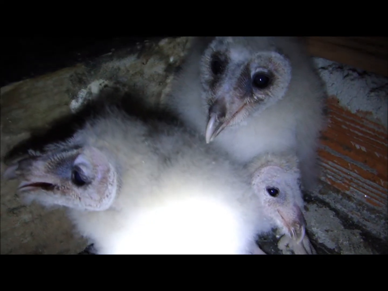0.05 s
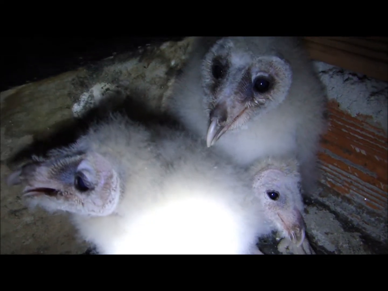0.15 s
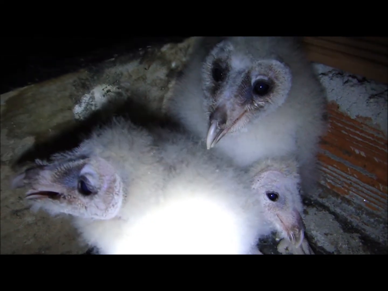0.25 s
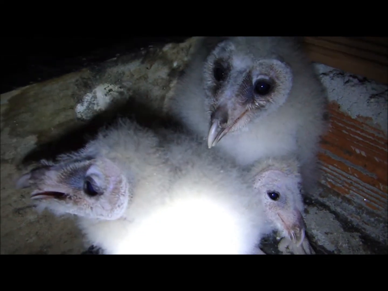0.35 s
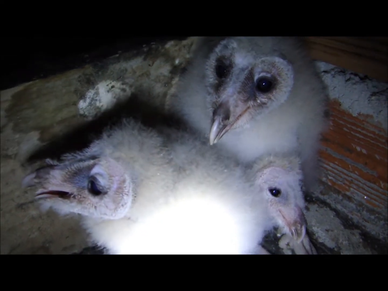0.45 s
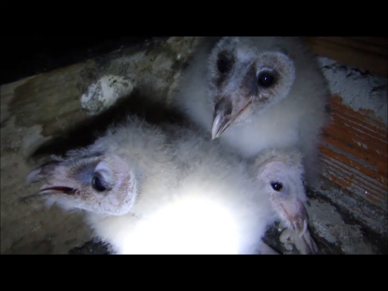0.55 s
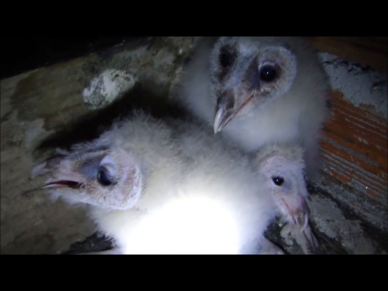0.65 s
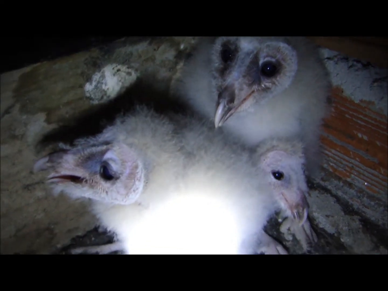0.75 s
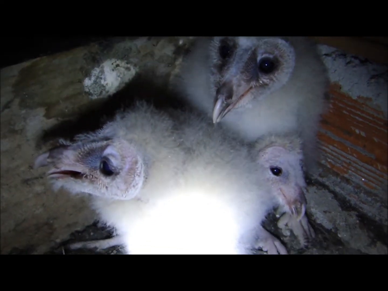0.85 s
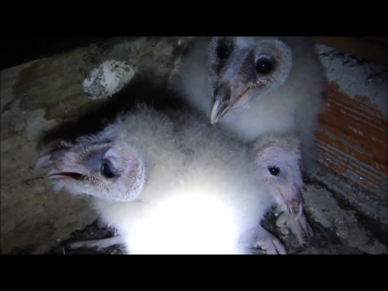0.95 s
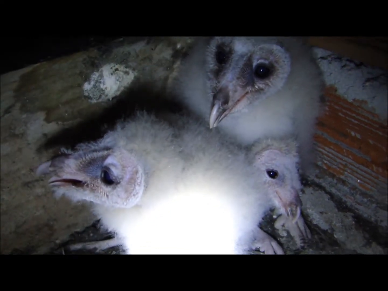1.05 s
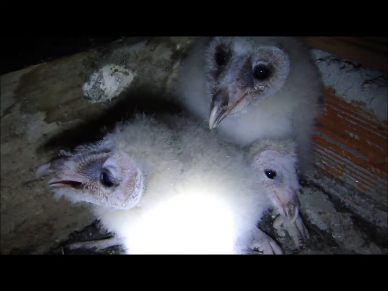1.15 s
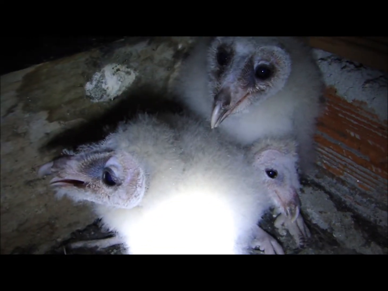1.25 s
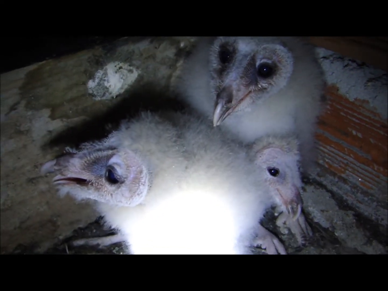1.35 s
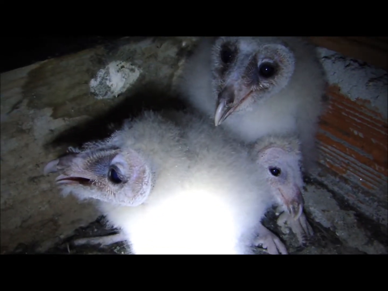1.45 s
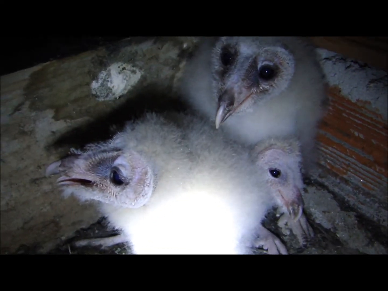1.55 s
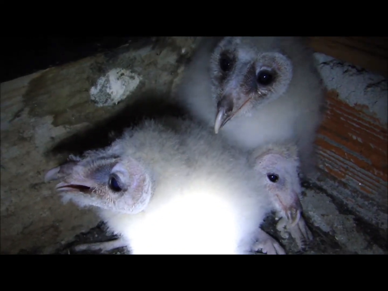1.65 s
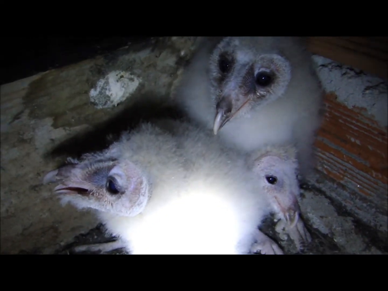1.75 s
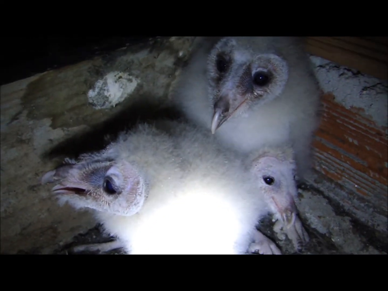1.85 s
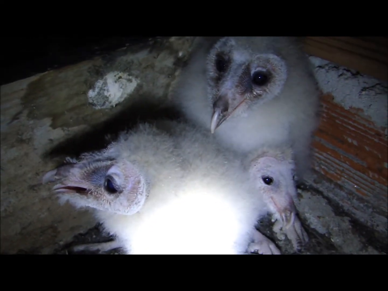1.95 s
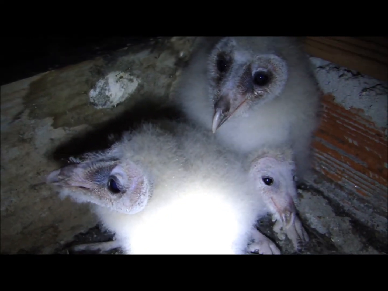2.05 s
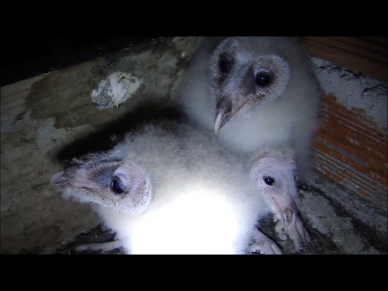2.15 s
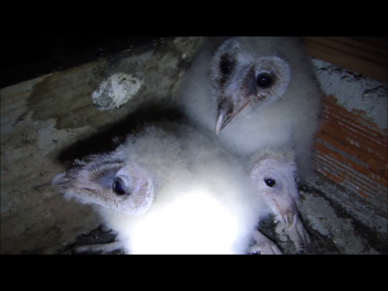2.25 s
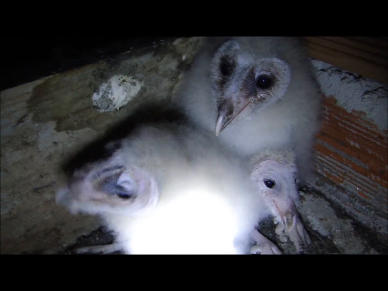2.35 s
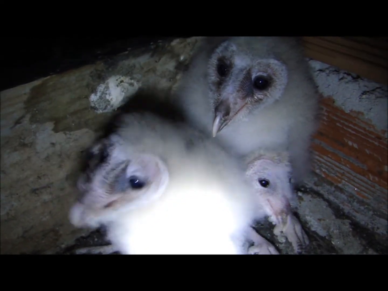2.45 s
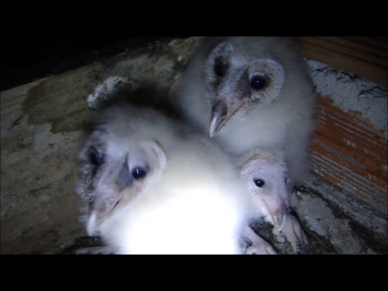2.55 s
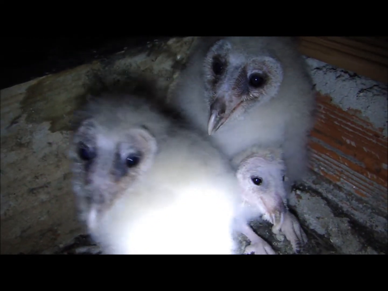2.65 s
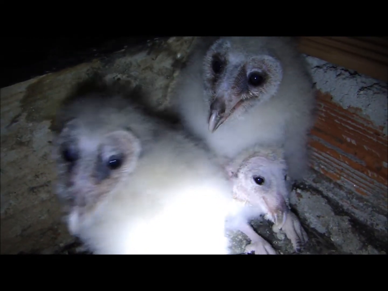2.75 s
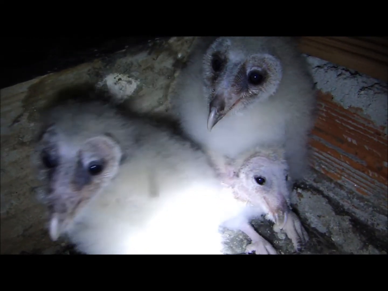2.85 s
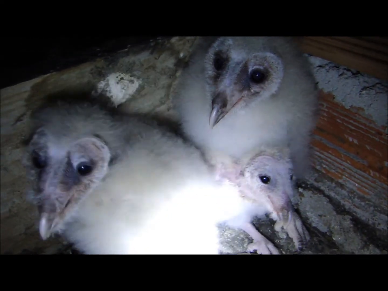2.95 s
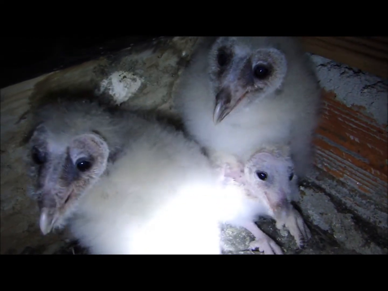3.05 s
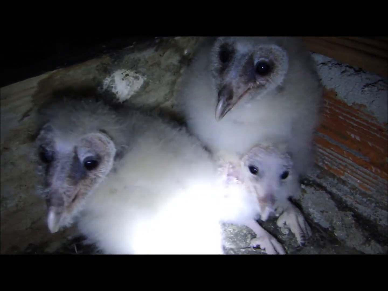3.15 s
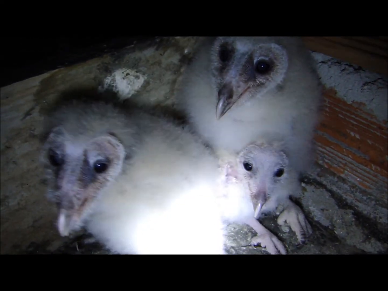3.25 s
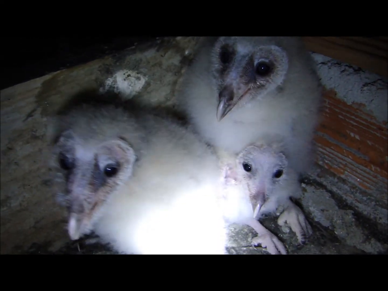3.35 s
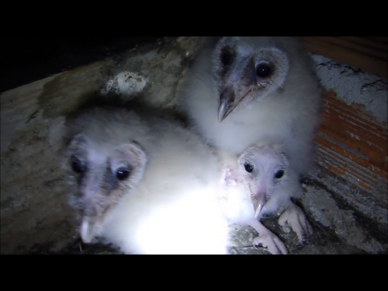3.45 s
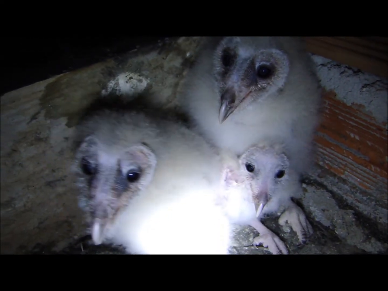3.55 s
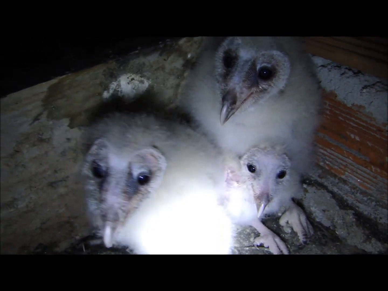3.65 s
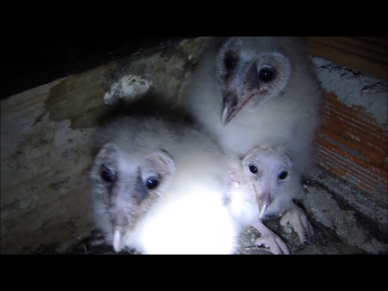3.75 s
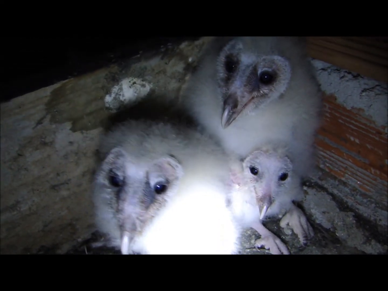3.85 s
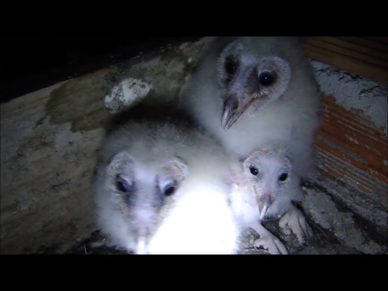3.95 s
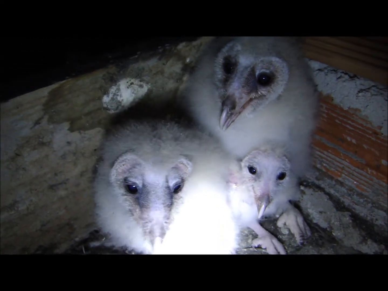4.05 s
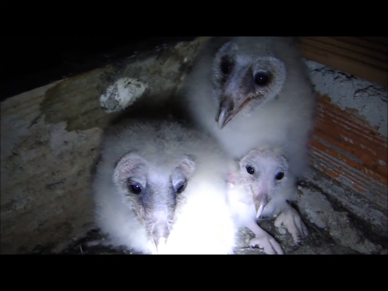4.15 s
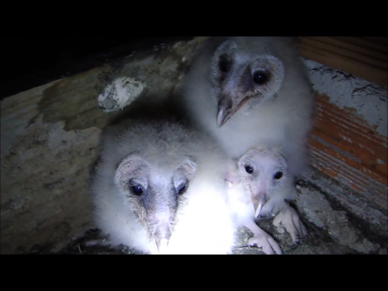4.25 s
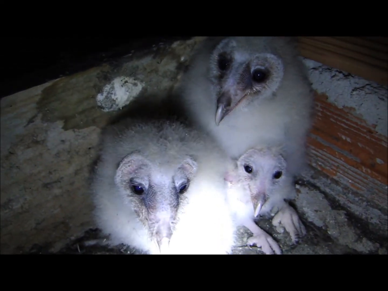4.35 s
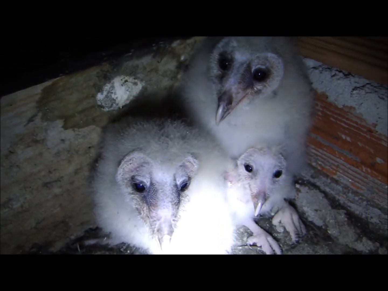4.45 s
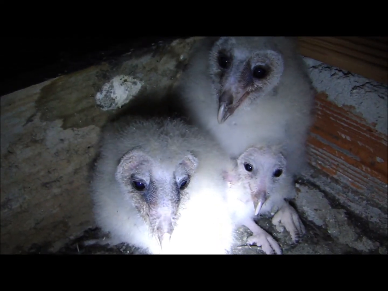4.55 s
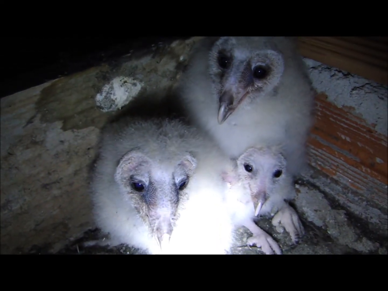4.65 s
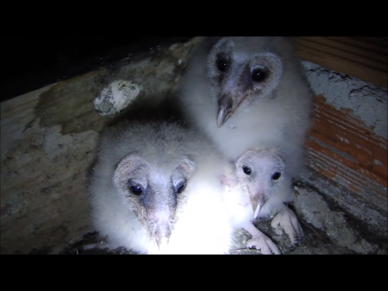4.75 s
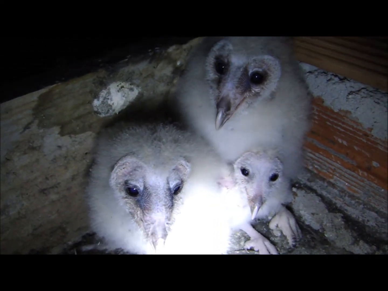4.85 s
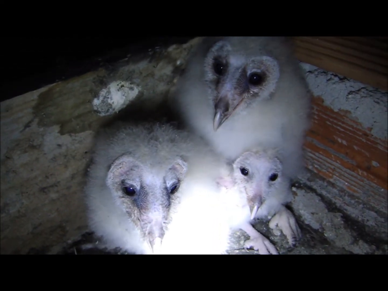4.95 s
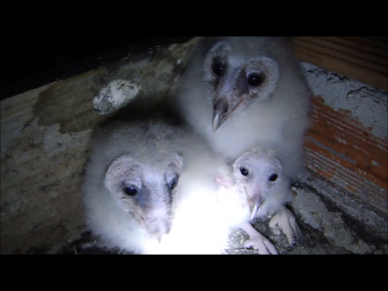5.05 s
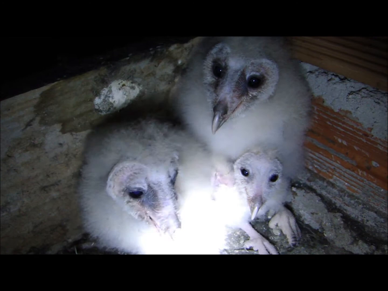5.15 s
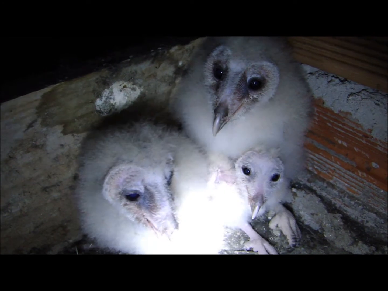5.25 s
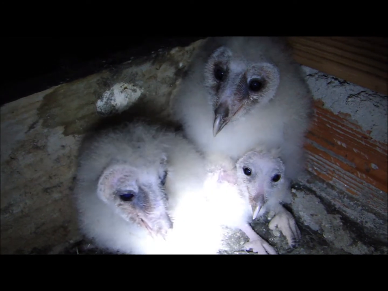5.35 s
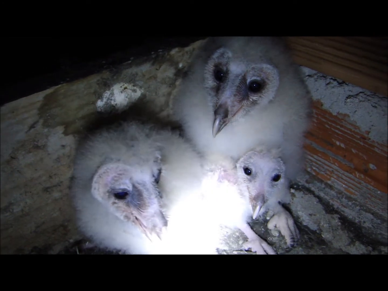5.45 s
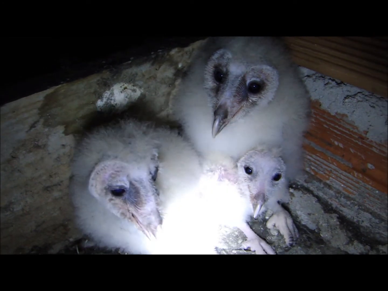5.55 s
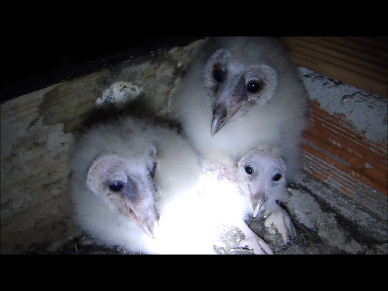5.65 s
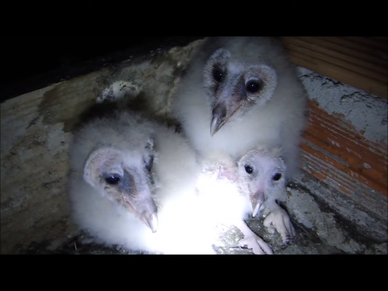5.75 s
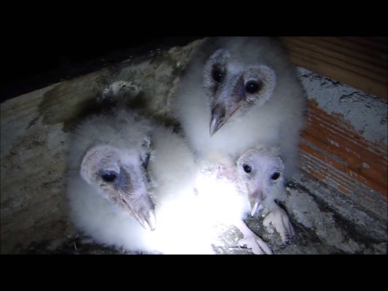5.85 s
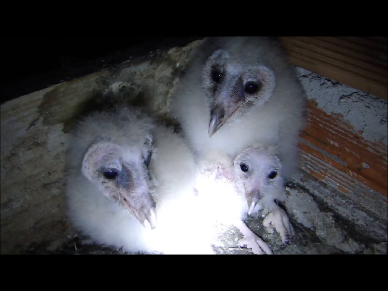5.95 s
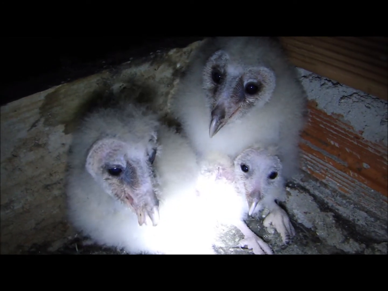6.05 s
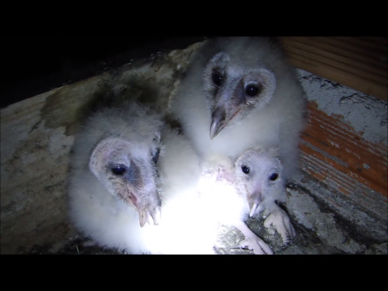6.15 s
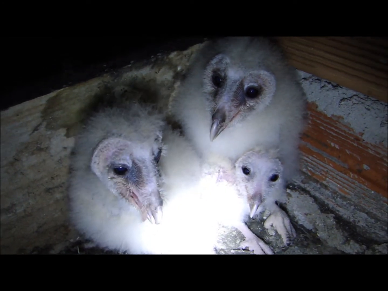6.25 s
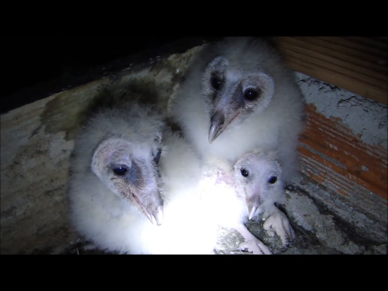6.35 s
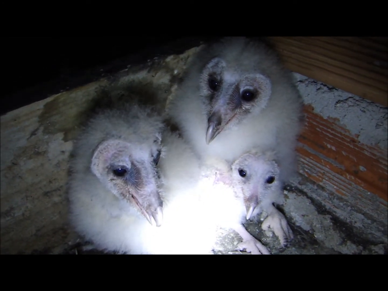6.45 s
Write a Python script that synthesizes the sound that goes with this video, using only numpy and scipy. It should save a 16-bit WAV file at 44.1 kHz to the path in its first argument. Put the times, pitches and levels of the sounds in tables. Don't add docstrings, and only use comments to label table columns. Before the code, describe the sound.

Owl chicks hiss close to a small camera in a cramped wooden nest. Two rough, airy hisses overlap from the start; the nearer stops first and the softer one stumbles out. Faint litter rustle and a hollow bill snap fill the pause, then a third hiss bursts in with a throaty pop and continues, with another snap beneath it, until an abrupt cut.

```python
import sys
import numpy as np
from scipy import signal
from scipy.io import wavfile
from scipy.ndimage import uniform_filter1d, minimum_filter1d

SR = 44100
rng = np.random.default_rng(int(sys.argv[2]) if len(sys.argv) > 2 else 0)


def ratio(d):
    e = np.asarray(d, float) / 20
    return 10 ** e


def transcribe(u):
    v = np.clip(np.atleast_2d(u).T, -1, 1)
    q = np.round(v * 32767).astype(np.int16)
    wavfile.write(sys.argv[1], SR, q)


N = 287091


def evened(x):
    return x / np.sqrt(np.mean(x ** 2) + 1e-20)


def read(points, hz, axis=1):
    columns = np.transpose(points)
    return np.interp(np.log(hz + 1), np.log(columns[0] + 1), columns[axis])


def ring(hz, db, t60):
    t = np.arange(8000) / SR
    return ratio(db - 60 * t / t60) * np.sin(2 * np.pi * hz * t)


def pressure(t, breath, lungs, falters):
    start, end, effort_db, swell_db, flutter_db = breath
    build_db, build_s, fade_db, fade_s, _ = lungs
    catch_s, slack_flutter = .035, .11
    age, left = np.maximum(t - start, 0), np.maximum(end - t, 0)
    lost_db = build_db * np.exp(-age / build_s) + fade_db * np.exp(-left / fade_s)
    for s, depth_db, sag_s in falters:
        lost_db = lost_db + depth_db * np.exp(-((t - s) / np.where(t < s, sag_s, catch_s)) ** 2)
    return effort_db + swell_db * age - lost_db, flutter_db + slack_flutter * lost_db


def opening(t, start, first, drift, turn_s, length_s, share):
    turn = share * (1 + np.tanh((t - turn_s) / length_s)) / 2
    return np.clip(first + drift * (t - start) + turn, 0, 1)


def throat_power(throat, hz, pose):
    power = 0
    for hz0, hz1, width, db0, db1, pan_db in throat:
        center = hz0 + (hz1 - hz0) * pose
        shape = (1 + (2 * (hz - center) / (1.443 * width)) ** 2) ** -2
        ports = ratio([pan_db, -pan_db])[:, None, None]
        power = power + ratio(2 * (db0 + (db1 - db0) * pose)) * shape * ports
    return power


def pocket_dip(pockets, hz, pose):
    dip_db = 0
    for hz0, hz1, width, db0, db1 in pockets:
        center = hz0 + (hz1 - hz0) * pose
        depth_db = np.maximum(db0 + (db1 - db0) * pose, 0)
        dip_db = dip_db + depth_db * np.exp(-(2 * (hz - center) / width) ** 2)
    return dip_db


def hiss(breath, lungs, falters, bill, throat, pockets, lag_s, patchy_db, end_s, pops=()):
    t = np.arange(N) / SR
    start, end = breath[:2]
    effort_db, flutter_db = pressure(t, breath, lungs, falters)
    flutter = evened(uniform_filter1d(uniform_filter1d(rng.standard_normal(N), 90), 60))
    jet = rng.standard_normal(N) * ratio(flutter_db * flutter)
    for at, db in pops:
        jet[round(at * SR)] = ratio(db)
    hz, frames, z = signal.stft(evened(jet), SR, nperseg=512, noverlap=384)
    hz = hz[:, None]
    pose = opening(frames, start, *bill)

    power = throat_power(throat, hz, pose) * ratio(-2 * pocket_dip(pockets, hz, pose))
    power = power / (1 + (300 / (hz + 1)) ** 6)
    patches = uniform_filter1d(rng.standard_normal(z.shape), size=6, axis=0)
    patches = evened(uniform_filter1d(patches, size=20, axis=1))
    gain = np.sqrt(power / power.mean((0, 1))) * ratio(patchy_db * patches)
    dull_s = .055
    dulling = np.exp(-np.maximum(end - frames, 0) / dull_s)
    gain = gain * ratio(-lungs[-1] * hz / 1000 * dulling)
    delay = np.array([np.exp(2j * np.pi * hz * lag_s), 1 + 0 * hz])
    pair = signal.istft(z * gain * delay, SR, nperseg=512, noverlap=384)[1][:, :N]
    gate = np.clip((t - start) / 0.00094 + 1, 0, 1) * np.clip((end - t) / end_s + .5, 0, 1)
    return pair * gate * ratio(effort_db)


# start in seconds, end in seconds, effort in dB, swell in dB per second,
# flutter in dB.
NEAR_BREATH = (0, 1.925, -17.5, -.2, .4)
# build in dB, build in seconds, fade in dB, fade in seconds,
# dulling in dB per kHz.
NEAR_LUNGS = (.3, .3, 5, .022, 1.3)
# deepest in seconds, depth in dB, sag in seconds.
NEAR_FALTERS = [
    (1.36, 1.5, .04),
]
# first pose from 0 to 1, drift per second, turn in seconds,
# turn length in seconds, turn size from 0 to 1.
NEAR_BILL = (.21, .06, 1.45, .07, .42)
# first Hz, last Hz, width in Hz, first level in dB, last level in dB,
# left-right in dB.
NEAR_THROAT = [(1316, 1690, 390, -6, -7.5, -2.5), (1874, 2040, 180, -2.5, -7.7, -11.5),
               (2340, 2200, 210, -7.5, -10.5, 9), (2900, 2770, 730, -9, -12.5, -8),
               (4200, 4550, 700, -7, -6, 0.2), (5650, 4500, 2500, -16, -22, -5),
               (7570, 7200, 1220, -12.5, -18.5, 0.5), (9360, 8600, 480, -13, -12.5, -1.5),
               (10500, 11300, 850, -2.5, -25, -3.7), (12350, 11140, 560, -9, -37, 8)]
# first Hz, last Hz, width in Hz, first depth in dB, last depth in dB.
NEAR_POCKETS = [(10100, 9500, 1100, 2, 22), (8900, 8300, 420, 7, 14)]


def near_chick():
    return hiss(NEAR_BREATH, NEAR_LUNGS, NEAR_FALTERS, NEAR_BILL, NEAR_THROAT, NEAR_POCKETS,
                lag_s=.00005, patchy_db=0.2, end_s=0.012)


# start in seconds, end in seconds, effort in dB, swell in dB per second,
# flutter in dB.
FAR_BREATH = (0, 2.955, -30.5, 1.3, .85)
# build in dB, build in seconds, fade in dB, fade in seconds, dulling in dB per kHz.
FAR_LUNGS = (.3, .3, 5.5, .08, .1)
# deepest in seconds, depth in dB, sag in seconds.
FAR_FALTERS = [
    (2.39, 3.5, .08),
    (2.57, 3.5, .06),
    (2.74, 5.5, .05),
    (2.9, 2.5, .03),
]
# first pose from 0 to 1, drift per second, turn in seconds,
# turn length in seconds, turn size from 0 to 1.
FAR_BILL = (.12, .03, 2.25, .22, .42)
# first Hz, last Hz, width in Hz, first level in dB, last level in dB,
# left-right in dB.
FAR_THROAT = [(628, 746, 312, -3.5, -0.7, -10), (1145, 1080, 190, 3.7, -2.3, -11.5),
              (1770, 1660, 250, -2, -6, -3), (2620, 2430, 740, -3.5, -1.5, -8.5),
              (4430, 4420, 700, -4, -11, -5), (6900, 5900, 1400, -25, -19, -5),
              (8080, 7500, 640, -20.5, -16.5, -14), (10200, 3400, 2000, -24, -27, -2.5),
              (12230, 11300, 1050, -2, -9, -2.5)]
# first Hz, last Hz, width in Hz, first depth in dB, last depth in dB.
FAR_POCKETS = [(6060, 5900, 420, 17, 9), (8900, 8750, 290, 11, 10), (9700, 9800, 600, 11, 2)]


def far_chick():
    return hiss(FAR_BREATH, FAR_LUNGS, FAR_FALTERS, FAR_BILL, FAR_THROAT, FAR_POCKETS,
                lag_s=-0.000038, patchy_db=0.33, end_s=0.011)


def scattered(x):
    z = signal.stft(x, nperseg=512, noverlap=384)[2]
    turn = np.exp(2j * np.pi * rng.random(z.shape[1:]))
    return 2 * signal.istft(z * turn, nperseg=512, noverlap=384)[1][:, :N] * (x != 0)


# pitch in Hz, time to fall 60 dB in seconds.
BOX = [(250, 0.05), (1000, 0.05), (4600, 0.038), (10000, 0.043)]
# pitch in Hz, level in dB, time to fall 60 dB in seconds.
LOFT = [(250, -30, .1), (600, -22, 0.4), (920, -11, 0.42), (1500, -13, 0.2), (2500, -23.5, .1),
        (5000, -23, 0.11)]


def box():
    taps = np.zeros((2, 13000))
    at = np.arange(80, 12960, 20) + rng.integers(0, 20, (2, 644))
    np.put_along_axis(taps, at, rng.choice([-1., 1.], at.shape), 1)
    hz, t, z = signal.stft(taps, SR, nperseg=128)
    hz = hz[:, None]
    box_decay = ratio(-60 * t / read(BOX, hz))
    loft_decay = ratio(read(LOFT, hz) - 60 * t / read(LOFT, hz, axis=2))
    tail = signal.istft(z * (box_decay + loft_decay), SR, nperseg=128)[1]
    return tail / np.linalg.norm(tail, axis=1, keepdims=True)


# pitch in Hz, width in Hz, depth in dB.
HOLLOWS = [(814, 36, 8), (1036, 75, 7.5), (1317, 39, 5), (1540, 30, 4.5), (2142, 37, 7), (3380, 200, 1.5),
           (7450, 70, 1.5)]


def hollowed(x):
    for hz, width, db in HOLLOWS:
        x = x - (1 - ratio(-db)) * signal.lfilter(*signal.iirpeak(hz, hz / width, SR), x)
    return signal.sosfilt(signal.butter(6, 290, "high", fs=SR, output="sos"), x)


# pitch in Hz, level in dB per Hz.
FLOOR = [(18, -50), (30, -22), (77, -12.5), (330, -8), (420, -4), (1100, -7), (7500, -23.5), (12900, -27)]
# pitch in Hz, likeness from -1 (opposed) to 1 (same).
FLOOR_SAME = [(30, .7), (100, -0.1), (300, -0.59), (2000, -.5), (5000, -0.25), (9000, -0.05), (13000, -0)]
# pitch in Hz, level in dB.
WHINE = [(7822, -92), (7854, -86), (7881, -67.5), (7913, -87)]


def floor():
    floor_db = -51
    frames, hz = N // 256 + 5, np.fft.rfftfreq(1024, 1 / SR)
    a, b, c, d, patches = rng.standard_normal((frames, 513, 5)).T
    patches = evened(uniform_filter1d(uniform_filter1d(patches, size=10, axis=0), size=12, axis=1))
    same = np.clip(read(FLOOR_SAME, hz), -1, 1)[:, None]
    left = a + 1j * b
    right = same * left + np.sqrt(1 - same ** 2) * (c + 1j * d)
    z = np.array([left, right]) * ratio(read(FLOOR, hz)[:, None] + 0.74 * patches)
    z = z / (1 + (hz[:, None] / 12000) ** 24)
    noise = signal.istft(z, nperseg=1024, noverlap=768)[1][:, :N]
    t = np.arange(N) / SR
    whine = sum(ratio(db + 1) * np.sin(2 * np.pi * (f * t + rng.random())) for f, db in WHINE)
    return ratio(floor_db) * evened(noise) + whine * ratio([[-1.5], [1.5]])


# middle in seconds, half length in seconds, level in dB.
SHUFFLE = [
    (3.2, .16, -60),
    (3.82, .11, -53.5),
]
# start in seconds, level in dB, pitch in Hz, time to fall 60 dB in seconds.
RINGS = [
    (2.949, -38, 1205, 0.26),
    (3.452, -50, 3300, .03),
]


def shuffle():
    lumps = evened(uniform_filter1d(rng.standard_normal(N), 130))
    grains = rng.standard_normal((2, N)) * ratio(1.9 * lumps)
    rustle = signal.sosfilt(signal.butter(2, [900, 3300], "band", fs=SR, output="sos"), grains)
    t = np.arange(N) / SR
    level = sum(ratio(db) * np.exp(-((t - s) / half) ** 4) for s, half, db in SHUFFLE)
    rings = np.zeros(N)
    for s, db, hz, t60 in RINGS:
        rings[round(s * SR):][:8000] = ring(hz, db, t60)
    return evened(rustle) * level + rings * ratio([[-3], [3]])


# time in seconds, peak in dB, left-right in dB.
SNAPS = [
    (4.2992, -3.5, -8),
    (5.6722, -5.5, -8),
]
# pitch in Hz, level in dB, time to fall 60 dB in seconds.
BILL_TONES = [(700, -26, 0.028), (937, 7, .016), (1180, 5, 0.008), (1860, 6, 0.005), (2720, 4, 0.003),
              (3800, -5.5, 0.007), (5030, -11, 0.006), (7900, -13, .003), (10800, -32, .002)]
# delay in seconds, level in dB.
WALLS = [(.0042, -7), (.0078, -13), (.0105, -17), (.0160, -21), (.0198, -21)]


def snaps():
    knock = -sum(ring(*mode) for mode in BILL_TONES)
    knock = knock * (1 - np.exp(-np.arange(len(knock)) / 2.5))
    knock = signal.sosfilt(signal.butter(2, 520, "high", fs=SR, output="sos"), knock)
    knock = signal.lfilter(*signal.iirnotch(6000, 2.5, SR), knock)
    train, echoes = np.zeros((2, 2, N))
    for s, db, pan_db in SNAPS:
        size = ratio(db + np.array([pan_db, -pan_db]) / 2)
        train[:, round((s + .0008) * SR)] = size
        train[:, round((s - .0002) * SR)] = -size * ratio(-18)
        for delay, wall_db in WALLS:
            echoes[:, round((s + delay + .0008) * SR)] = size * ratio(wall_db)
    train = train + uniform_filter1d(echoes, size=11)
    return ratio(-1.5) * signal.oaconvolve(train, knock[None] / abs(knock).max())[:, :N]


# start in seconds, end in seconds, effort in dB, swell in dB per second,
# flutter in dB.
LATE_BREATH = (4.866, 6.6, -14.3, -2.1, .5)
# build in dB, build in seconds, fade in dB, fade in seconds, dulling in dB per kHz.
LATE_LUNGS = (13.7, .3, .1, .03, .1)
# deepest in seconds, depth in dB, sag in
# seconds.
LATE_FALTERS = [
    (4.872, 3, .012),
    (5.7, 3, .015),
]
# first pose from 0 to 1, drift per second, turn in seconds,
# turn length in seconds, turn size from 0 to 1.
LATE_BILL = (.01, .1, 5.35, .3, .85)
# first Hz, last Hz, width in Hz, first level in dB, last level in dB,
# left-right in dB.
LATE_THROAT = [(510, 690, 450, -10, -13, -10), (1090, 1210, 230, 2.5, -1.5, -6.5),
               (1930, 1970, 320, -4.5, -2, -7), (2640, 2640, 910, -9, -5, -10),
               (3700, 3870, 335, -16.5, -4, -3.5), (4900, 4700, 2000, -18.5, -18, 1),
               (7650, 7080, 660, -.5, -1.5, -8), (7600, 7420, 890, -6.5, -4.5, -2.5),
               (9250, 9600, 780, -24, -17, 14.5), (10720, 10930, 420, -4.5, -.5, -6),
               (11300, 11980, 740, -10, -11.5, -1.5)]
# first Hz, last Hz, width in Hz, first depth in dB, last depth in dB.
LATE_POCKETS = [(3900, 5000, 340, 24, -8), (5720, 5660, 650, 4, 12), (4920, 6560, 850, 0.65, 18)]
# time in seconds, level in dB over the jet of air.
POPS = [
    (4.867, 28),
    (4.870, 24),
    (4.8895, 20),
    (4.913, 13),
]


def late_chick():
    return hiss(LATE_BREATH, LATE_LUNGS, LATE_FALTERS, LATE_BILL, LATE_THROAT, LATE_POCKETS,
                lag_s=.00001, patchy_db=0.6, end_s=0.00042, pops=POPS)


def scene():
    chicks = ratio(0.04) * (near_chick() + far_chick() + late_chick())
    knocks, tail = snaps(), box()
    chicks = chicks + ratio(-5) * signal.oaconvolve(scattered(chicks), tail, axes=1)[:, :N]
    knocks = knocks + ratio(-9) * signal.oaconvolve(knocks, tail, axes=1)[:, :N]
    return hollowed(chicks) + knocks + floor() + shuffle()


# pitch in Hz, threshold in dB against the middle band.
DROP = [(60, -42), (250, -33), (1000, -39), (4000, -27.5), (9000, -27.5), (11000, -36), (12500, -25),
        (13000, -12.5)]


def starve(x):
    hz, t, z = signal.stft(x, SR, nperseg=2048, noverlap=1024)
    edges = np.r_[np.arange(0, 40, 4), np.geomspace(40, 200, 12).astype(int), np.arange(200, 1025, 16)]
    edges = np.unique(edges)
    bins = np.diff(np.r_[edges, len(hz)])
    band_db = 10 * np.log10(np.add.reduceat(abs(z) ** 2, edges, 1) / bins[:, None] + 1e-20)
    middle = abs(z[:, (hz > 1500) & (hz < 3000)]) ** 2
    middle_db = 10 * np.log10(middle.mean((0, 1)) + 1e-20)
    middle_db = minimum_filter1d(uniform_filter1d(middle_db, size=3), size=7) + 5.5
    middle_db = middle_db + 0.15 * (middle_db + 47.5)
    wander_db = 2.8 * evened(uniform_filter1d(rng.standard_normal(band_db.shape[1:]), size=4))
    keep = np.clip(band_db - middle_db - read(DROP, hz[edges])[:, None] + wander_db, 0, 1)
    return signal.istft(z * np.repeat(keep, bins, 1), SR, nperseg=2048, noverlap=1024)[1][:, :N]


def band_limit(x):
    return signal.sosfilt(signal.butter(12, 13080, fs=SR, output="sos"), x)


def record(dry):
    peak_db = 20 * np.log10(abs(dry).max(0) + 1e-9)
    fall = np.arange(N) * 24.0 / SR
    over_db = np.maximum(np.maximum.accumulate(peak_db + fall) - fall - 1.5, 0)
    ducked = dry / ratio(.8 * uniform_filter1d(over_db, size=60, origin=29))
    mix = starve(ducked)
    return band_limit(mix)


dry = scene()
out = record(dry)
transcribe(out)
```